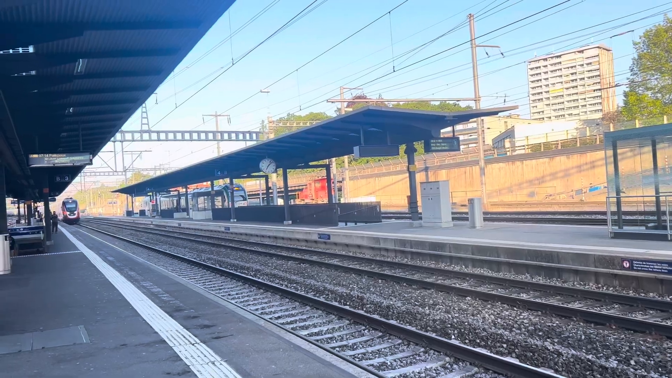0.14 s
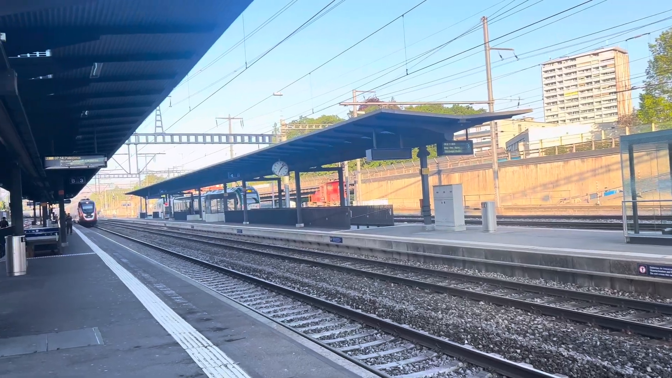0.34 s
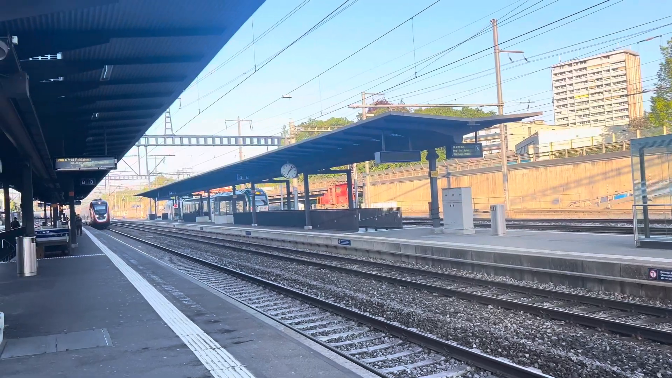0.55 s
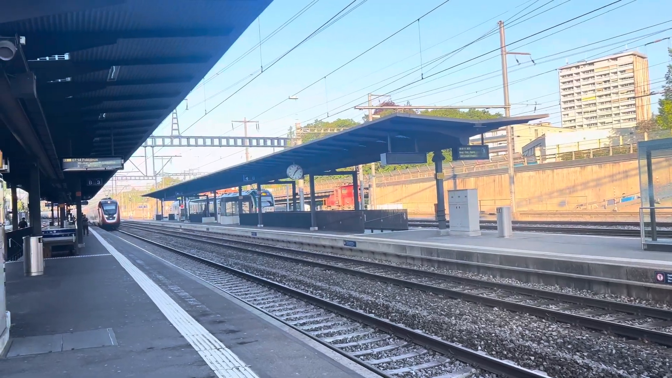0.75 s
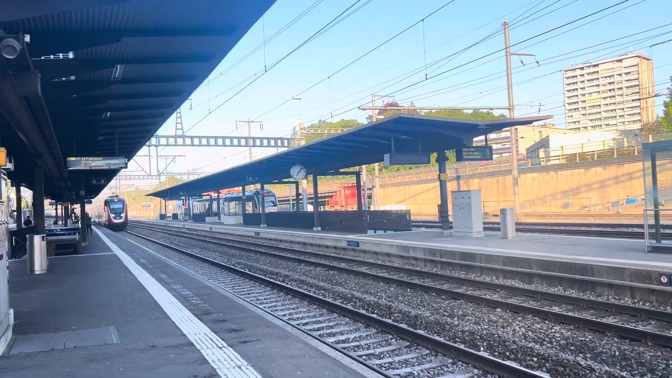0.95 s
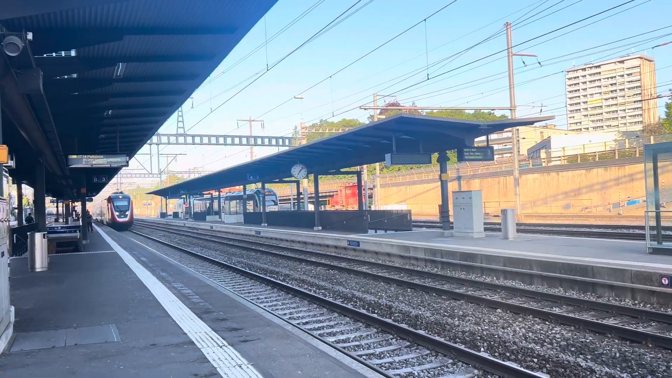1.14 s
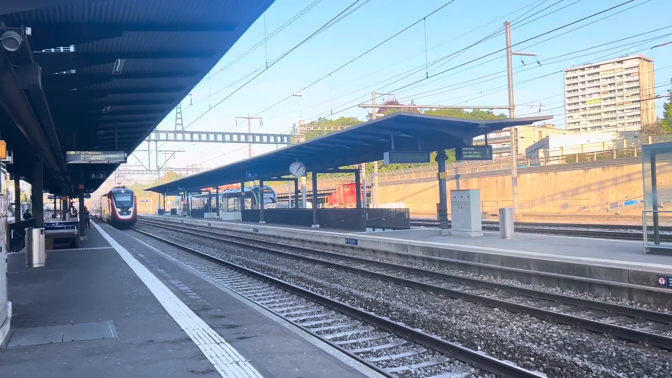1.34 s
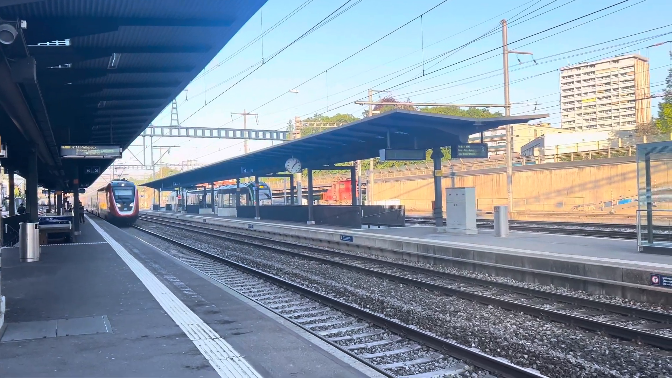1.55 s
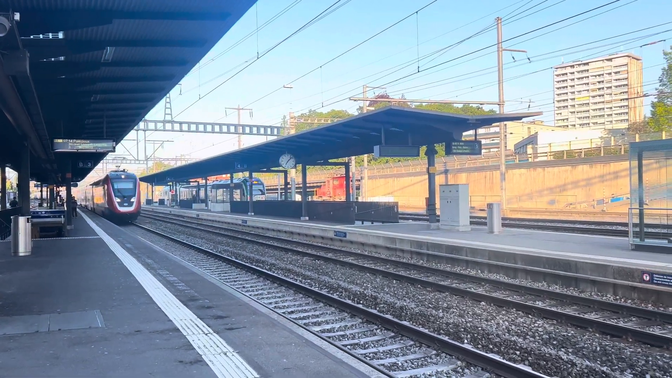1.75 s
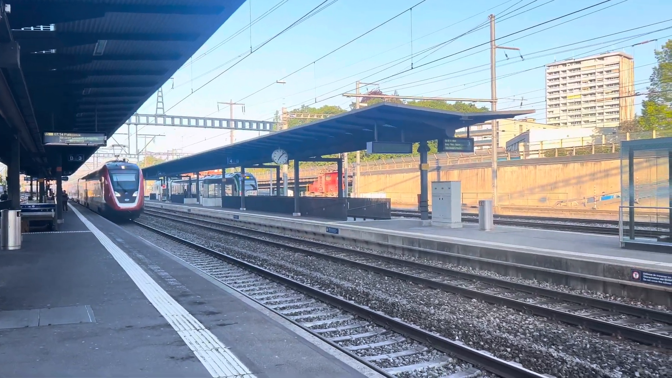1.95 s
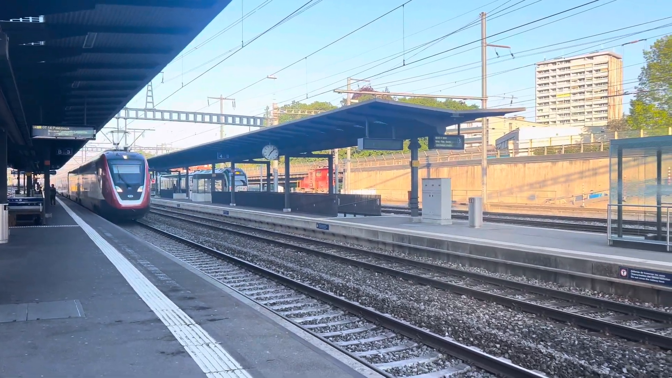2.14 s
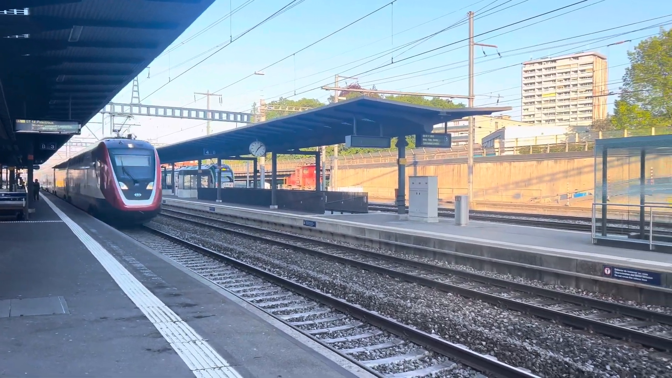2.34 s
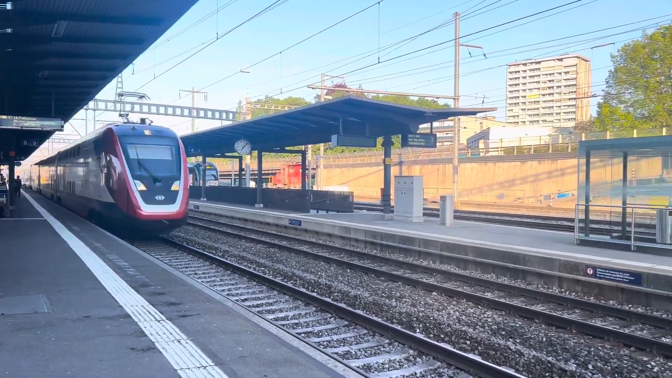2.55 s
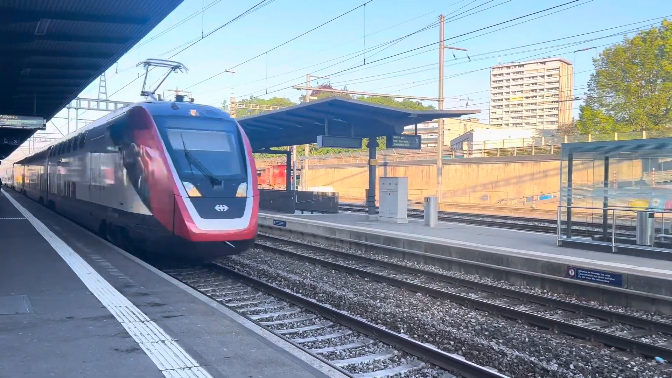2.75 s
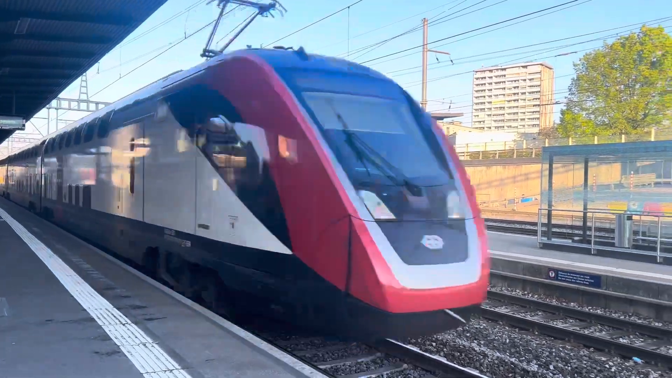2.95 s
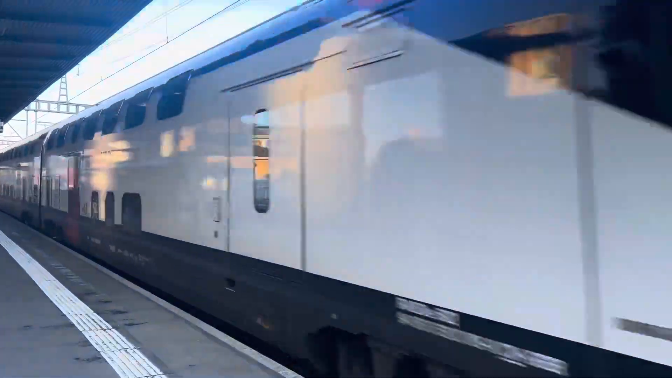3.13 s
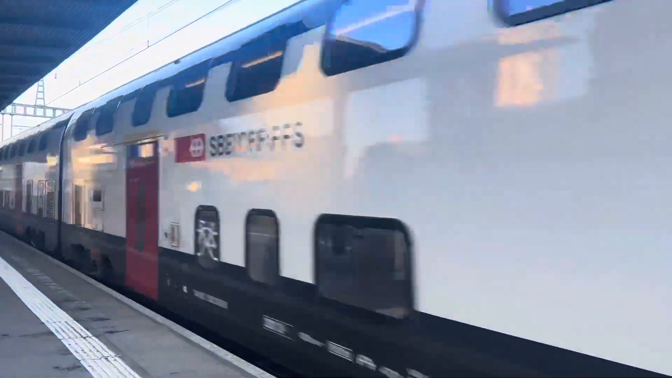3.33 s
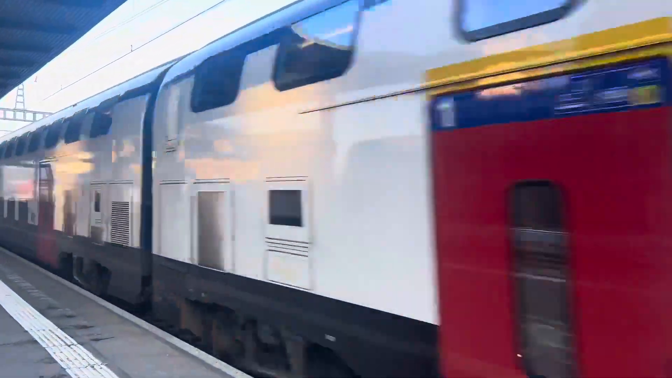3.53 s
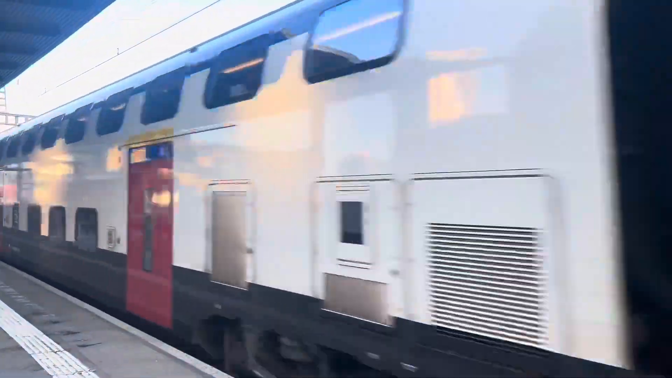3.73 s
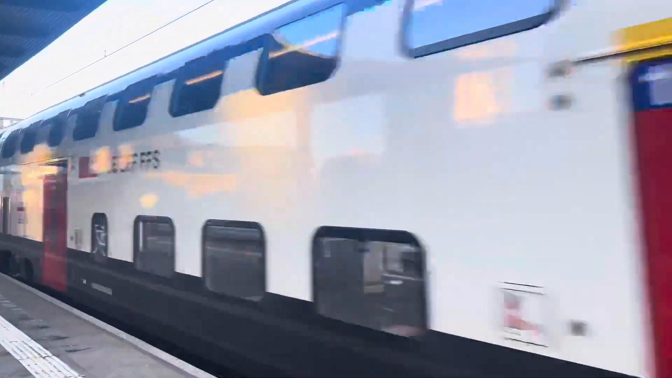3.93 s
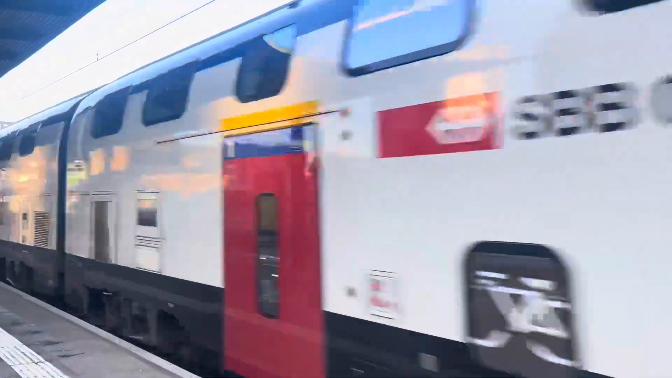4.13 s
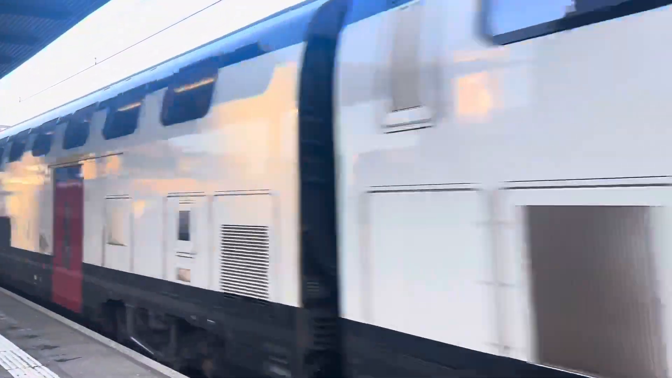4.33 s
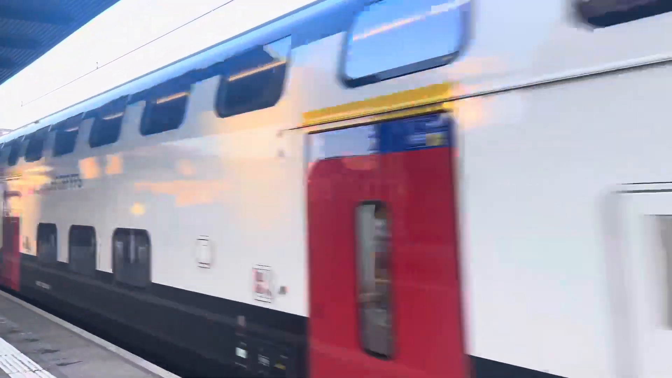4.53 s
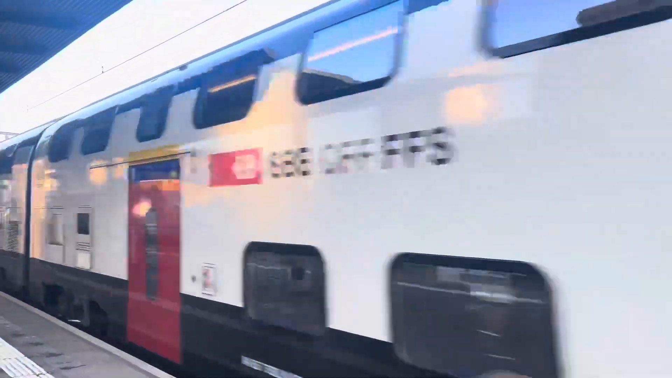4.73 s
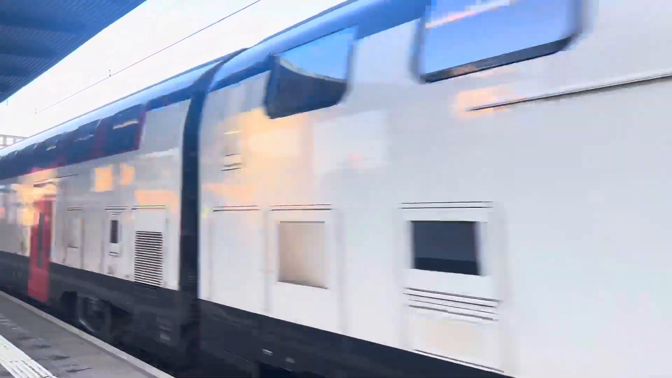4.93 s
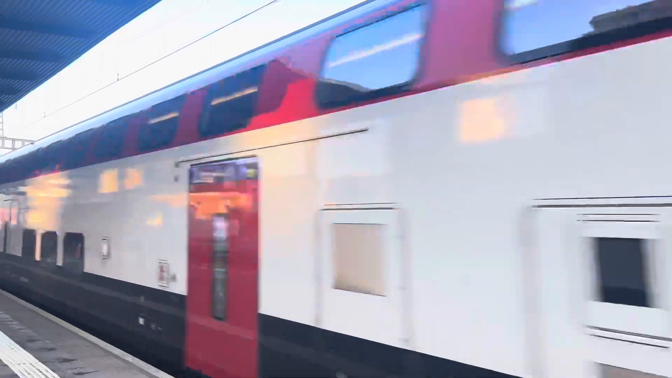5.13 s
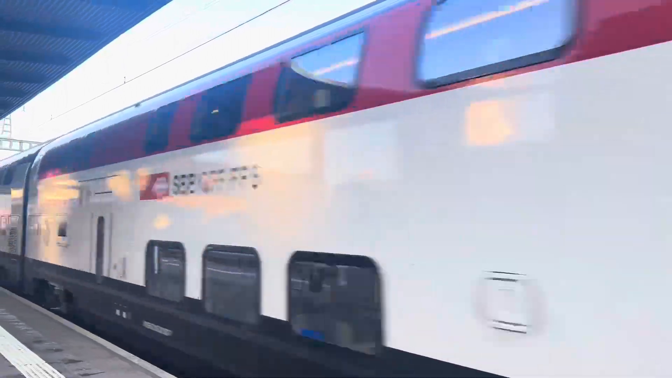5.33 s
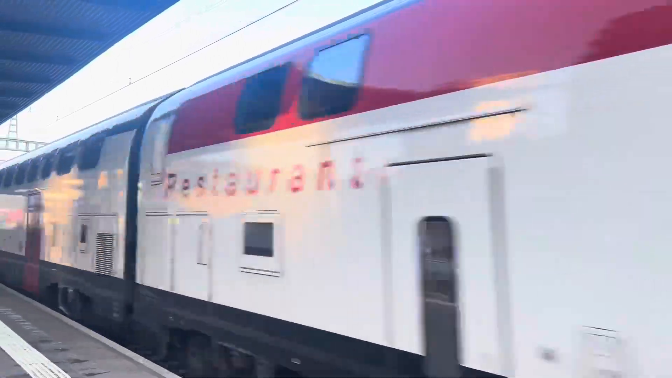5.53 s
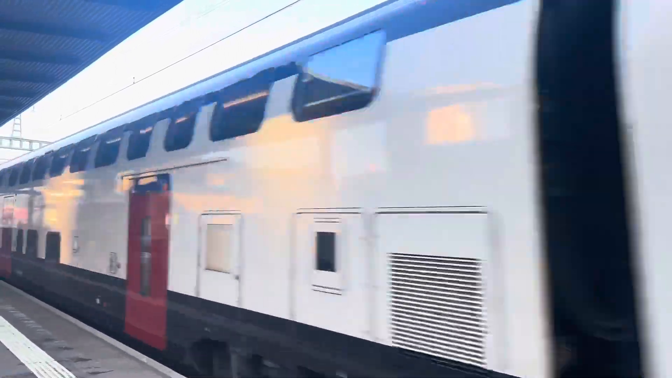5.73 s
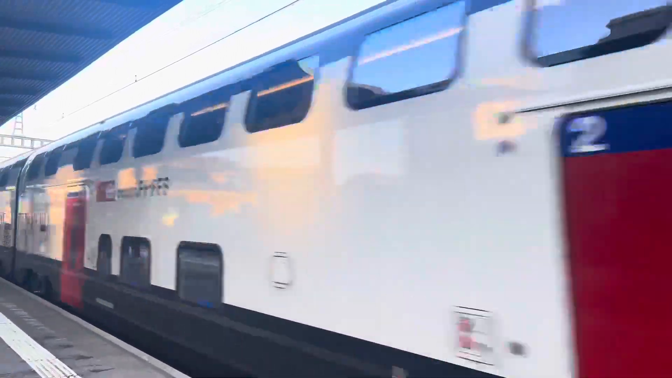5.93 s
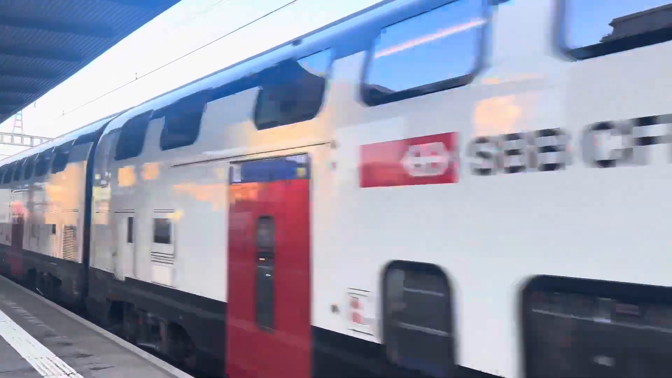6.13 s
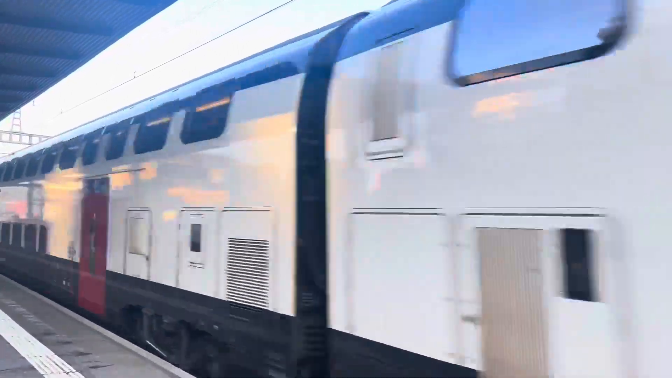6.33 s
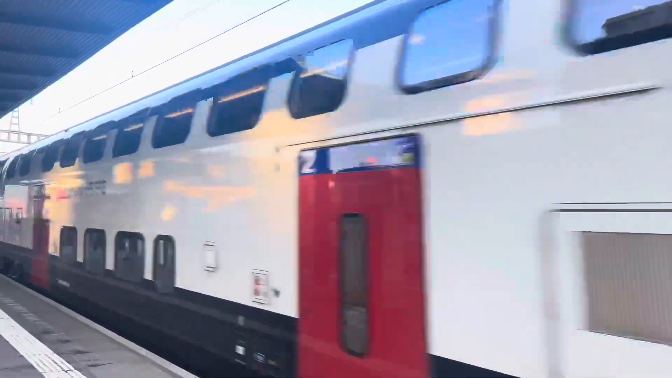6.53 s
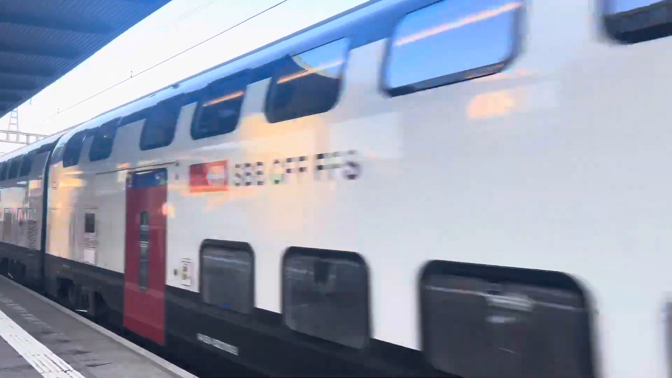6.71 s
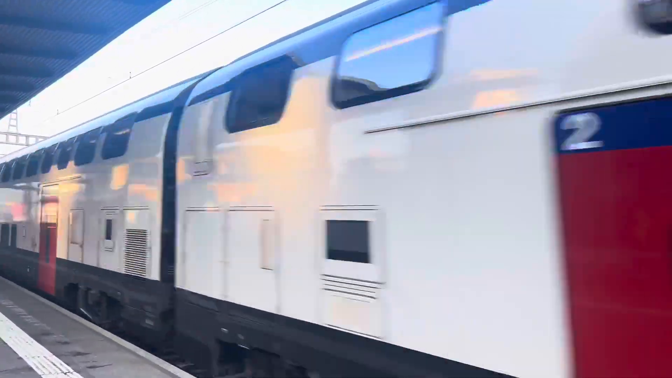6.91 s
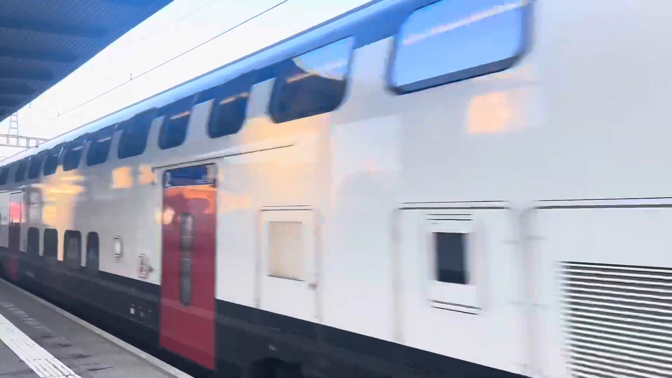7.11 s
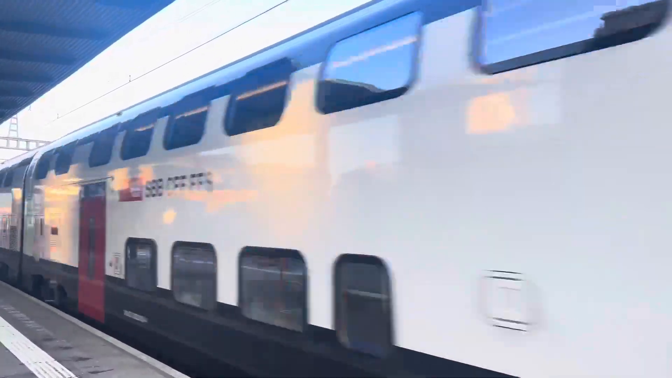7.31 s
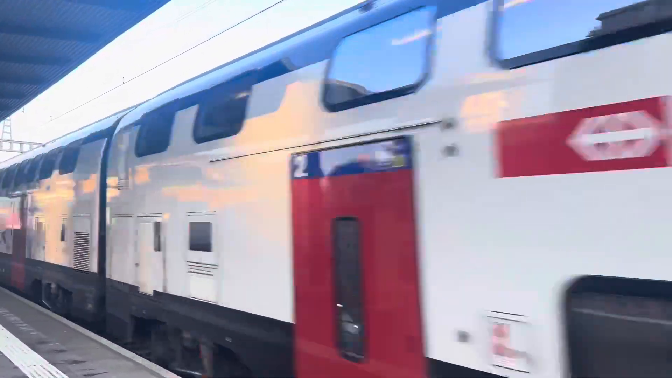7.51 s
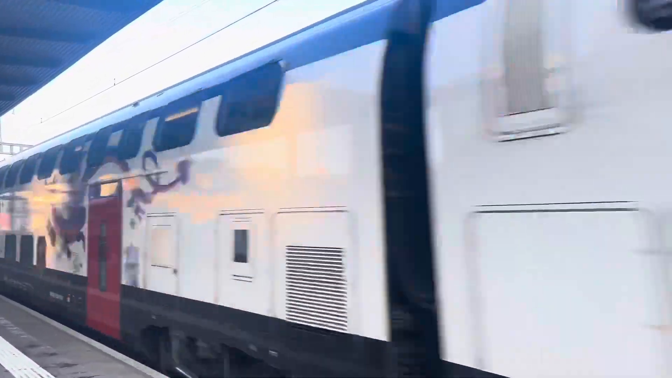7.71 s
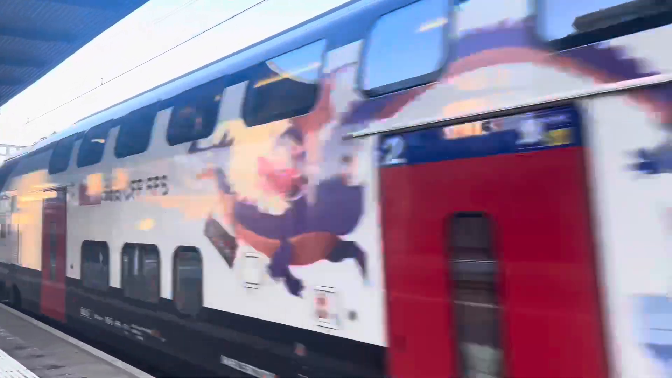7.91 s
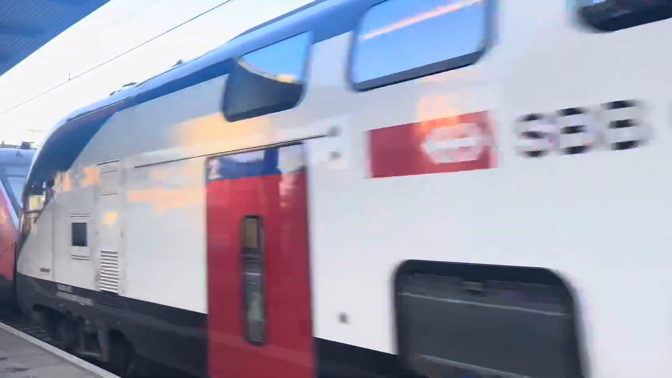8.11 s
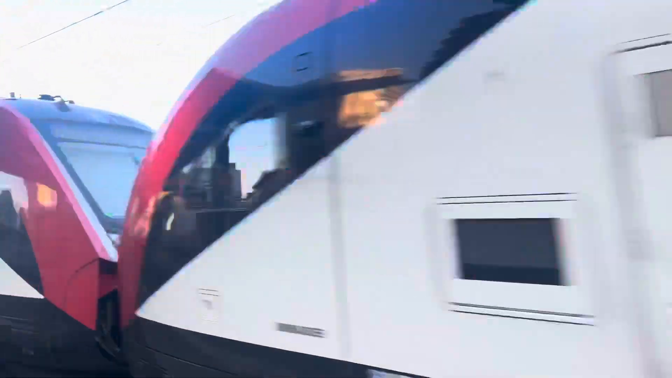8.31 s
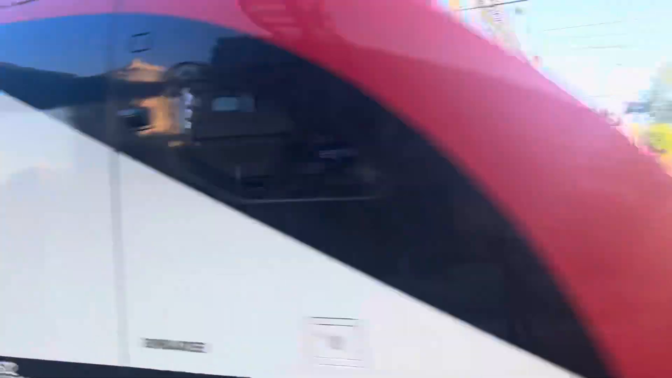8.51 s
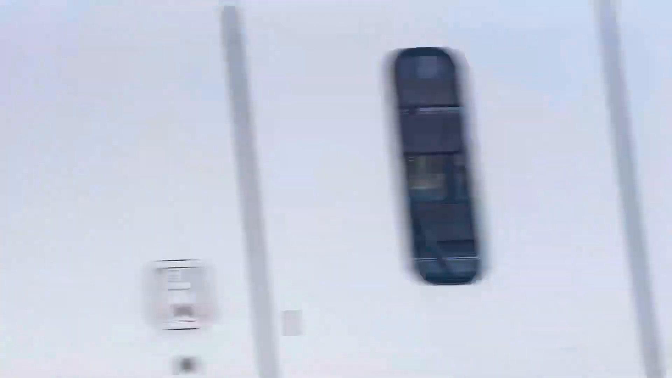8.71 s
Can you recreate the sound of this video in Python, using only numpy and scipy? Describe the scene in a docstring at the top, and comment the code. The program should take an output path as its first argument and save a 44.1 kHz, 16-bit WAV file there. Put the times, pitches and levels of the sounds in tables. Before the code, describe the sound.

Dull rolling noise and thin motor tones approach, then a long fast train thunders by in rumbling, rasping pulses with hissing rails and gusting air.

```python
"""Faint tones and dull rolling noise come down the line, over a thin hiss and a low drone; drives whine.
Then a double-deck electric train sweeps past the platform at full speed: bogies boom and rasp, track rumbles,
pushed air roars, eddies slap and the rear collector sizzles. Each noise source is coloured noise, swelling as it
nears; the drives and far tones are sines. Many slide down in pitch by Doppler, and roof echoes mottle the train.
"""
import sys
import numpy as np
from scipy import signal
from scipy.fft import rfft, irfft, next_fast_len
from scipy.io import wavfile
from scipy.ndimage import uniform_filter1d, minimum_filter1d

SR = 44100
rng = np.random.default_rng(int(sys.argv[2]) if len(sys.argv) > 2 else 0)


def pcm_store(signal):
    """Save signal as 16-bit PCM."""
    levels = np.round(np.clip(np.atleast_2d(signal), -1, 1) * 32767)
    wavfile.write(sys.argv[1], SR, levels.astype(np.int16).T)


N = 390726
TIME = np.arange(N) / SR
SIZE = next_fast_len(N + N // 4)  # spare noise for Doppler to read ahead
HZ = np.fft.rfftfreq(SIZE, 1 / SR)
SPEED = 38.0  # m/s
MACH = SPEED / 343
NOSE_S = 3.093  # s, the front of the train is abreast
WHEEL_HZ = 13.2  # turns of a wheel each second


# bogie groups abreast of the microphone: [t/s, level/dB, underfloor boom/dB over the rolling noise, boom f/Hz]
BOGIE_GROUPS = [(3.12, -19.5, 7, 214), (3.68, -22.5, 3.5, 240), (4.42, -21.5, 15, 260),
                (5.08, -23.5, 10, 248), (5.83, -22.5, 7, 253), (6.511, -21.5, 7.5, 248),
                (7.21, -22.5, 4.5, 320), (7.82, -28, 12, 238), (8.479, -26.5, 23, 167),
                (8.66, -33.5, 29, 246)]
# spectrum of the rolling wheels: [f/Hz, relative level/dB per Hz]
ROLLING_SPECTRUM = [(25, -50), (80, -13), (250, 0.5), (550, 0), (740, 1), (920, -5.5), (1200, -6),
                    (1700, -19), (2300, -22.5), (3300, -17), (5000, -36), (7000, -25), (14000, -78)]


def bogies():
    """Each bogie group swells, booms in the cavity under the floor, drops in pitch and crosses left to right."""
    out = np.zeros((2, N))
    rolling = amp(along(ROLLING_SPECTRUM))
    for s, db, boom_db, boom_hz in BOGIE_GROUPS:
        bearing, _ = passing(s - 0.02, metres=4.6)
        # one bogie on each side of the coach joint; the platform edge hides distant wheels
        _, near_first = passing(s - 0.08, metres=5.5)
        _, near_second = passing(s + 0.08, metres=5.5)
        near = np.sqrt(near_first ** 4 + near_second ** 4)
        unevenness_db = 1.2 * wobble(25) + 1.0 * throb(WHEEL_HZ)  # wheels are never quite round
        boom = amp(boom_db * hump(boom_hz, width_hz=70))
        noise = rush(rolling * boom, bearing, direct=0.4 + 0.65 * bearing, mach=MACH)
        out += amp(db + unevenness_db) * near * noise
    return out


# single bogies that set wheel and rail ringing: [t/s, low mode level/dB, high mode level/dB]
RINGING_BOGIES = [(3.04, -31, -35), (3.22, -26, -22), (3.65, -21.5, -24.5), (3.74, -26, -22),
                  (4.35, -20.5, -21.5), (4.48, -26.5, -24.5), (5.0, -28.5, -31.5), (5.19, -27.5, -28.5),
                  (5.7, -27.5, -27.5), (5.89, -26.5, -25.5), (6.44, -27, -26.5), (6.57, -25, -25),
                  (7.21, -27, -24), (7.759, -29, -30), (7.91, -30, -30.5), (8.451, -33, -35),
                  (8.65, -32, -31)]
# low and high mode of wheel and rail, one row each: [f/Hz, width/Hz]
RING_MODES = [(1200, 270), (1630, 380)]
# bright spray of wheel noise under a close bogie: [f/Hz, relative level/dB per Hz]
SPRAY_SPECTRUM = [(1200, -32), (2100, 11), (2900, -5.5), (3800, -13), (4800, -0.5), (6500, -10),
                  (9500, -13), (13500, -28)]


def rasp():
    """Rough treads ring wheel and rail in uneven bursts and spray hiss near a bogie; each burst sags in pitch."""
    passes = [passing(s, metres=5.6) for s, *_ in RINGING_BOGIES]
    bearings, near = np.transpose(passes, (1, 0, 2))
    power = near ** 8  # the platform edge cuts the sound off steeply
    bearing = (power * bearings).sum(axis=0) / power.sum(axis=0)  # mostly that of the nearest bogie
    mode_gains = amp(np.transpose(RINGING_BOGIES)[1:])
    low, high = np.sqrt(mode_gains ** 2 @ power)
    voices = [
        (low, hump(*RING_MODES[0])),
        (high, hump(*RING_MODES[1])),
        (amp(-11.5) * high, amp(along(SPRAY_SPECTRUM))),
    ]
    out = np.zeros((2, N))
    for level, colour in voices:
        clumps = unit(amp(1.3 * wobble(28) + 1.4 * wobble(110) + 0.8 * throb(WHEEL_HZ)))
        out += level * clumps * rush(colour, bearing, direct=0.33 + 0.5 * bearing, mach=MACH)
    return out


# rumble spectrum, strongest near the 60 Hz drumming of the sleepers: [f/Hz, relative level/dB per Hz]
TRACK_SPECTRUM = [(10, -45), (22, -35), (32, -17), (40, -18.5), (58, 0.5), (75, -1.5), (97, -5.5),
                  (125, -15.5), (220, -15), (600, -100)]
RUMBLE_HZ = 10.9  # throbs of the track rumble each second


def track_rumble():
    """Sleepers drum in a low noise band along the whole train, throbbing and heaving with each gust."""
    bearing, _ = passing(NOSE_S, metres=1.4)
    _, gust_rumble = gusts()
    steady = train_level(db=-23.0, reach_m=31.0, steepness=1.67, fade_db_per_s=1.06)
    heave = amp(0.99 * throb(RUMBLE_HZ) + 0.2 * wobble(5.5))
    return np.hypot(gust_rumble, steady) * heave * rush(amp(along(TRACK_SPECTRUM)), bearing, direct=0.27)


# roar of the air along the coaches: [f/Hz, relative level/dB per Hz]
AIR_SPECTRUM = [(25, -55), (60, -38), (110, 0.5), (150, -2.5), (185, -2.5), (230, 2), (280, -0.5),
                (330, -5.5), (385, -5), (470, -9), (700, -14.5), (1500, -12.5), (5000, -40)]


def pushed_air():
    """Air tumbles along the coaches, roaring loudest at the blunt parts and a little more at the wheels."""
    bearing, _ = passing(NOSE_S, metres=1.4)
    gust_roar, _ = gusts()
    steady = train_level(db=-27.5, reach_m=31.0, steepness=1.76, fade_db_per_s=0.5)
    level = np.hypot(gust_roar, steady * amp(2 * wheels_near()))
    return level * amp(0.24 * wobble(30)) * rush(amp(along(AIR_SPECTRUM)), bearing, direct=0.22)


# blunt parts (nose, rear collector, coupled cabs): [t/s, roar level/dB, rumble level/dB, reach/m]
BLUNT_PARTS = [(3.10, -21, -21.5, 9.8), (7.23, -21.5, -25, 21.6), (8.62, -24, -23.5, 8.4)]
RUMBLE_LAG_S = 0.12  # the rumble of a gust trails its roar


def gusts():
    """Gains of roar and rumble, swelling and sinking as each blunt part shoves the air aside."""
    roar = sum(amp(db) * passing(s, reach)[1] ** 2 for s, db, _, reach in BLUNT_PARTS)
    rumble = sum(amp(db) * passing(s + RUMBLE_LAG_S, reach)[1] ** 2 for s, _, db, reach in BLUNT_PARTS)
    return roar, rumble


# hiss of the rails: [f/Hz, relative level/dB per Hz]
RAIL_SPECTRUM = [(60, -45), (200, 8), (550, 8.5), (850, 6.5), (1150, 12), (1500, 7.5), (2200, 7.5),
                 (3000, 1.5), (3800, -0.5), (4600, 3.5), (5250, 3), (5900, -5), (7500, -7), (11500, -14),
                 (14300, -11.5), (14900, -54)]


def rail_hiss():
    """The rails hiss along the whole train, strongest around each bogie group."""
    bearing, _ = passing(NOSE_S, metres=1.4)
    level = train_level(db=-29.0, reach_m=34.2, steepness=2.07, fade_db_per_s=1.3) * amp(7.32 * wheels_near())
    return level * amp(0.3 * wobble(12)) * rush(amp(along(RAIL_SPECTRUM)), bearing, direct=0.28)


def tread_hiss():
    """Fine hiss from the contact of wheel and rail, carrying only from the nearest bogies."""
    bearing, _ = passing(NOSE_S, metres=1.6)
    level = train_level(db=-39.5, reach_m=34, steepness=2.2, fade_db_per_s=1.5) * amp(13 * (wheels_near() - 1))
    return level * rush(hump(11870, width_hz=3100) ** 2, bearing, direct=0)


# eddies off nose, coach joints and collector: [t/s, level/dB, centre f/Hz, spread of the swell/s]
EDDIES = [(2.96, -22, 190, 0.1), (3.105, -15, 120, 0.028), (3.19, -21, 270, 0.03), (3.24, -18, 140, 0.028),
          (3.35, -21, 78, 0.06), (4.41, -20.5, 270, 0.04), (4.58, -23, 68, 0.035), (4.97, -27, 620, 0.05),
          (7.095, -20, 240, 0.014), (7.217, -15.5, 280, 0.03), (7.315, -19.5, 78, 0.022)]


def slaps(spread=0.28):
    """Eddies slap the platform: each is one short, dull puff of band noise, sent alike to both ports."""
    out = np.zeros(N + SR)
    t = np.arange(-SR // 4, SR // 4) / SR
    hz = np.fft.rfftfreq(len(t), 1 / SR)
    for s, db, centre_hz, half_s in EDDIES:
        band = np.exp(-0.5 * (np.log((hz + 1) / centre_hz) / spread) ** 2)
        swell = np.exp(-0.5 * (t / half_s) ** 2)
        puff = swell * irfft(band * rfft(rng.standard_normal(len(t))), len(t))
        puff *= np.linalg.norm(swell) / np.linalg.norm(puff)
        start = round((s + t[0]) * SR)
        out[start:start + len(t)] += amp(db) * puff
    return out[:N]


COLLECTOR_S = 7.24  # the rear collector is abreast


def pantograph():
    """The rear collector sizzles on the wire, sliding down in pitch; a scrape and the hum of its struts trail it."""
    bearing, _ = passing(COLLECTOR_S, metres=6.5)
    _, near = passing(COLLECTOR_S - 0.08, metres=6.5)  # it throws its sound forward
    _, abreast = passing(COLLECTOR_S + 0.01, metres=1.2)
    _, trail = passing(COLLECTOR_S + 0.1, metres=4.6)
    _, wake = passing(COLLECTOR_S + 0.14, metres=7.2)
    sizzle = amp(-46.5 + 2 * wobble(20)) * rush(hump(11900, width_hz=850), bearing, direct=0.2, mach=MACH)
    scrape = amp(-33) * rush(hump(2600, width_hz=2600), bearing, direct=0.51, mach=MACH)
    hum = amp(-29.5) * rush(hump(462, width_hz=20), bearing, direct=0.43, mach=MACH)
    return (near ** 3 + abreast ** 2) * sizzle + trail ** 5 * scrape + wake ** 2 * hum


# the two drives, front one first: [t/s abreast, f/Hz at rest]
DRIVES = [(3.3, 1013), (3.755, 847)]
# loudness curve of the front drive: [t/s, level/dB]
FRONT_DRIVE_LEVEL = [(0, -57), (0.8, -48.5), (1.6, -43), (2.2, -41), (2.45, -30), (2.68, -36),
                     (2.88, -31.5), (3.05, -44), (3.4, -90)]
# loudness curve of the second drive: [t/s, level/dB]
SECOND_DRIVE_LEVEL = [(3.1, -90), (3.33, -35), (3.55, -28), (3.67, -23.5), (3.73, -41), (3.83, -32.5),
                      (4.03, -34), (4.5, -90)]


def whines():
    """Drive tones hold their pitch while coming and slide down as they pass; echoes make them flutter."""
    out = np.zeros((2, N))
    for (s, hz), level in zip(DRIVES, (FRONT_DRIVE_LEVEL, SECOND_DRIVE_LEVEL)):
        bearing, _ = passing(s, metres=3.1)
        doppler_hz = hz / (1 + MACH * bearing)
        pitch = doppler_hz * (1 + 0.0022 * wobble(30))
        gain = amp(np.interp(TIME, *np.transpose(level)))
        out += gain * tone(pitch, bearing, echo=0.42, flutter=22)
    return out


# rolling noise from down the line: [f/Hz, relative level/dB per Hz]
DISTANT_SPECTRUM = [(25, -54), (80, -3), (160, 1), (250, -2.5), (480, -1), (700, -1.5), (950, -5),
                    (1140, 1), (1350, -4), (1750, -7.5), (2200, -11), (2700, -27), (5000, -41),
                    (14500, -36)]


def approach():
    """Dull rolling noise grows down the line until the front has passed, then fades."""
    level = train_level(db=-22.5, reach_m=25.2, steepness=1.42, fade_db_per_s=3.0)
    bearing, _ = passing(NOSE_S, metres=3.8)
    return level * amp(0.6 * wobble(5.8)) * rush(amp(along(DISTANT_SPECTRUM)), bearing, direct=0.42)


# faint tones far up the line: [f/Hz, level/dB at the start, slope/dB per s]
FAR_TONE_VOICES = [(690, -50, 2), (829, -51, -3), (1202, -55.5, 3)]


def far_hum():
    """Thin, slightly wavering tones of the distant train, gone by the time the nose arrives."""
    bearing, near = passing(NOSE_S, metres=12)
    coming = (1 - near) * (TIME < NOSE_S)
    out = np.zeros((2, N))
    for hz, db, slope in FAR_TONE_VOICES:
        out += amp(db + slope * TIME) * tone(hz + wobble(8), bearing, echo=0.6, flutter=10)
    return coming * out


# steady background hiss: [f/Hz, relative level/dB per Hz]
HISS_SPECTRUM = [(100, 15), (900, 40), (2100, 29), (3000, 23), (4000, 24.5), (5200, 24), (6300, -20),
                 (14500, 4)]
# low drone of the town: [f/Hz, relative level/dB per Hz]
DRONE_SPECTRUM = [(15, -32), (30, -16), (39, -4), (47, -3), (70, -2.5), (110, -15), (200, -12), (400, -26),
                  (1000, -75)]


def station():
    """A faint steady hiss and a low drone, both fully scattered noise, lie under everything."""
    hiss = amp(-43.5) * rush(amp(along(HISS_SPECTRUM)), np.zeros(N), direct=0)
    drone = amp(-40.5) * rush(amp(along(DRONE_SPECTRUM)), np.zeros(N), direct=0)
    return hiss + drone


def roof(x, depth_db=1.22):
    """Roof and pillar echoes interfere, drawn as random patches of the spectrum that swell and sink."""
    z = signal.stft(x, nperseg=1024)[2]
    patch = np.outer(np.hanning(7), np.hanning(17))  # about 130 Hz by 90 ms
    field = unit(signal.fftconvolve(rng.standard_normal(z.shape[1:]), patch, "same"))
    return signal.istft(z * amp(depth_db * field), nperseg=1024)[1][:, :N]


def train_level(db, reach_m, steepness, fade_db_per_s):
    """Gain of a sound spread along the train: it grows as the nose closes in, then eases off steadily."""
    gap = SPEED * np.maximum(NOSE_S - TIME, 0)
    fade_db = fade_db_per_s * np.maximum(TIME - NOSE_S, 0)
    return amp(db - fade_db) * (reach_m / np.hypot(gap, reach_m)) ** steepness


WHEEL_REACH_M = 7  # the rails stay excited this far around each bogie group
WHEEL_LAG_S = 0.044  # and ring on just behind it


def wheels_near():
    """1 as a bogie group goes by, less in the middle of a coach, near 0 with the train far off."""
    return np.max([passing(s + WHEEL_LAG_S, WHEEL_REACH_M)[1] for s, *_ in BOGIE_GROUPS], axis=0)


def passing(s, metres):
    """Bearing (-1 coming, +1 going) and nearness (1 abreast) of a point on the train."""
    ahead = SPEED * (TIME - s)
    distance = np.hypot(ahead, metres)
    return ahead / distance, metres / distance


def port_lag(bearing, coming_ms=-0.134, going_ms=0.449):
    """Samples by which the left port hears a source after the right one."""
    return np.interp(bearing, [-1, 1], [coming_ms, going_ms]) * SR / 1000


def rush(colour, bearing, direct, mach=0, port_gap_ms=0.42):
    """Stereo noise near rms 1: a direct share from one bearing, the rest scattered by roof and platform."""
    draws = rng.standard_normal((3, 2 * len(HZ)), dtype=np.float32).view(np.complex64)
    ray, mid, side = colour * draws
    alike = np.sinc(2 * HZ * port_gap_ms / 1000)  # scattered sound reaches both ports alike only in the bass
    mid, side = mid * np.sqrt((1 + alike) / 2), side * np.sqrt((1 - alike) / 2)
    ray = unit(irfft(ray, SIZE))
    scattered = unit(irfft(np.array([mid + side, mid - side]), SIZE))
    clock = np.cumsum(1 / (1 + mach * bearing))  # Doppler: played fast while coming, slowly while going
    samples = np.arange(SIZE)
    lag = port_lag(bearing) / 2
    ray = unit(np.array([np.interp(clock + shift, samples, ray) for shift in (-lag, lag)]))
    scattered = unit(np.array([np.interp(clock, samples, x) for x in scattered]))
    share = np.clip(direct, 0, 1)
    return np.sqrt(share) * ray + np.sqrt(1 - share) * scattered


def tone(pitch_hz, bearing, echo, flutter):
    """A stereo sine of rms 1 from one bearing; its echoes waver at random, flutter knots a second."""
    lag_cycles = np.outer([-0.5, 0.5], pitch_hz * port_lag(bearing))
    phase = 2 * np.pi * (np.cumsum(pitch_hz) + lag_cycles) / SR
    echoes = echo * np.array([wobble(flutter) + 1j * wobble(flutter) for port in range(2)])
    return unit(np.real((1 + echoes) * np.exp(1j * phase)))


def throb(rate_hz):
    """A nearly regular swing between -1 and 1."""
    return np.sin(2 * np.pi * (rate_hz * TIME + rng.random()) + 0.71 * wobble(5.1))


def wobble(rate):
    """A smooth random curve, rate knots a second."""
    knots = signal.resample_poly(rng.standard_normal(1024), 8, 1)
    return np.interp(TIME * rate * 8, np.arange(len(knots)), knots)


def hump(centre_hz, width_hz):
    """Gain of one resonance, 1 at its top."""
    return 1 / (1 + (2 * (HZ - centre_hz) / width_hz) ** 2)


def along(points):
    """(Hz, value) points joined on a log axis."""
    hz, value = np.transpose(points)
    return np.interp(np.log(HZ + 1), np.log(hz + 1), value)


def amp(db):
    """Decibels to gain."""
    return 10 ** (np.asarray(db) / 20)


def unit(x):
    """Scaled to rms 1."""
    return x / np.sqrt(np.mean(x ** 2) + 1e-20)


def limiter(x):
    """The gain dips smoothly around any peak above 0.9."""
    hold = SR // 100  # 10 ms
    gain = np.minimum(1, 0.9 / (np.abs(x).max(axis=0) + 1e-9))
    return x * uniform_filter1d(minimum_filter1d(gain, 2 * hold), hold)


def scene():
    """The train under the roof, with the sounds that bypass its echo patches."""
    train = bogies() + rasp() + track_rumble() + pushed_air() + rail_hiss() + approach()
    return roof(train) + slaps() + tread_hiss() + pantograph() + whines() + far_hum() + station()


# left port over right port: [f/Hz, level/dB]
PORT_BALANCE = [(60, 0), (200, 0.3), (500, 0.7), (1100, 3.5), (2330, 2), (4280, 5), (7870, 2.5),
                (14000, -1)]
# level of the centre by pitch, thinner near 9.7 kHz: [f/Hz, mid level/dB]
CENTRE_LEVEL = [(8500, 0), (9700, -12), (10900, 0)]
# stereo width by pitch, broad in the bass and narrow in the top treble: [f/Hz, side level/dB]
SIDE_LEVEL = [(60, 4.5), (130, 6.3), (250, 5), (500, 5.6), (1000, 1), (3000, -0.5), (5000, -1), (7300, -1),
              (8600, 3), (9700, 6), (11000, 1), (12000, -8)]
TOP_HZ = 14900  # upper band limit


def record(dry):
    """Two slightly unlike ports, an image whose width changes with pitch, a limiter and a band limit."""
    left, right = rfft(dry, SIZE) * amp(np.outer([0.5, -0.5], along(PORT_BALANCE)))
    mid = (left + right) / 2 * amp(along(CENTRE_LEVEL))
    side = (left - right) / 2 * amp(along(SIDE_LEVEL))
    held = limiter(irfft(np.array([mid + side, mid - side]), SIZE))
    return irfft(rfft(held) * (HZ < TOP_HZ), SIZE)[:, :N]


dry = scene()
out = record(dry)
pcm_store(out)
```